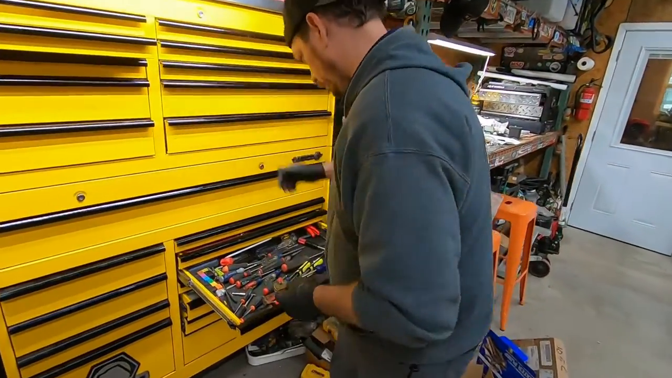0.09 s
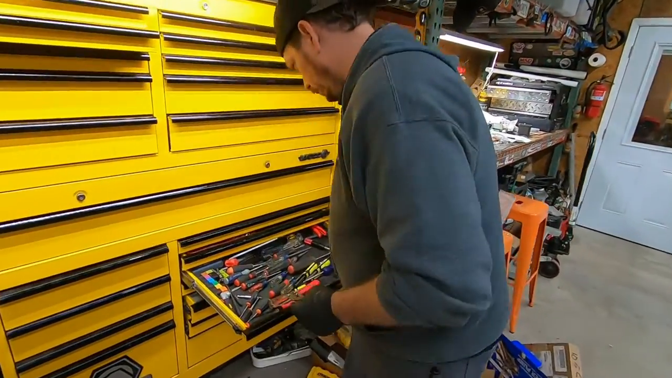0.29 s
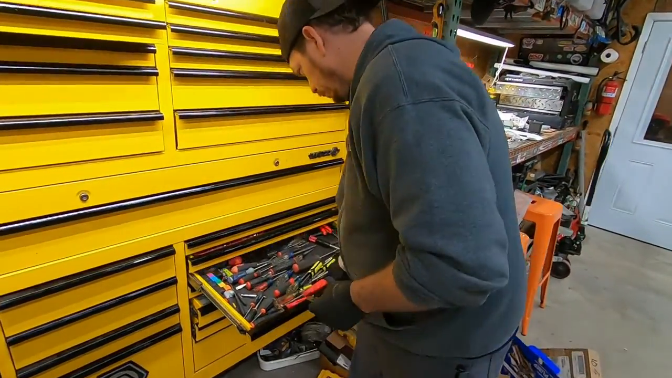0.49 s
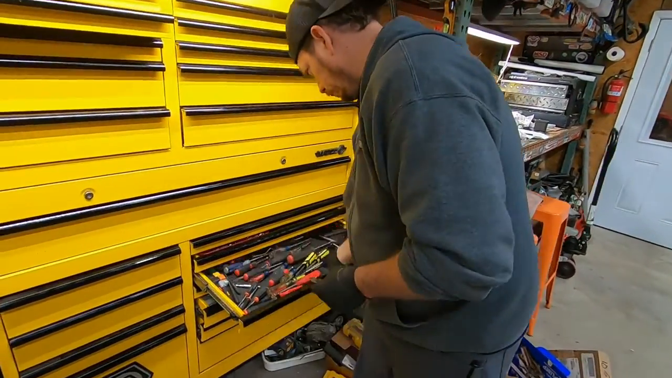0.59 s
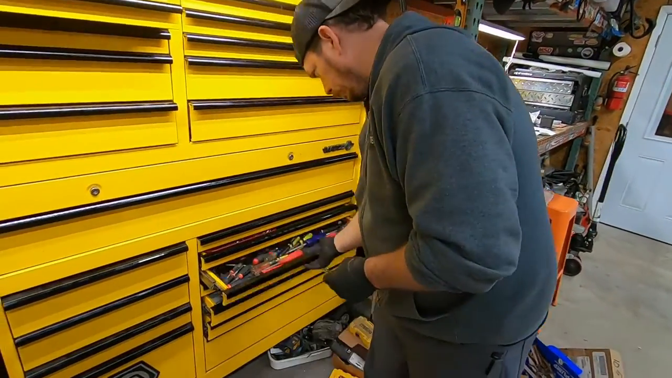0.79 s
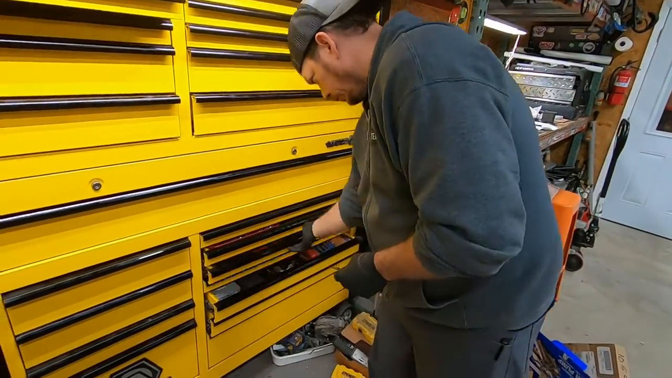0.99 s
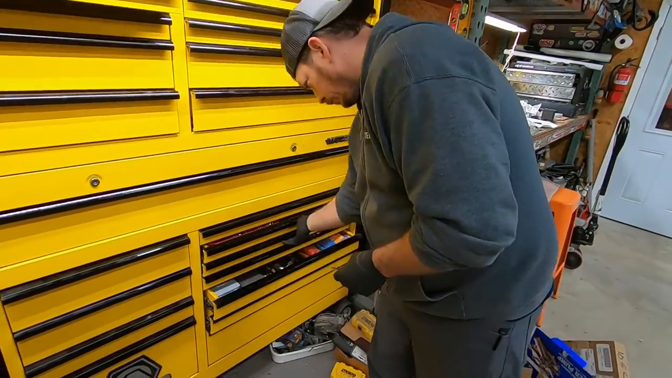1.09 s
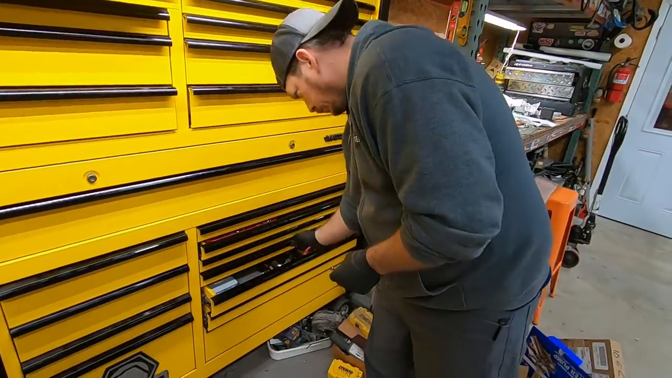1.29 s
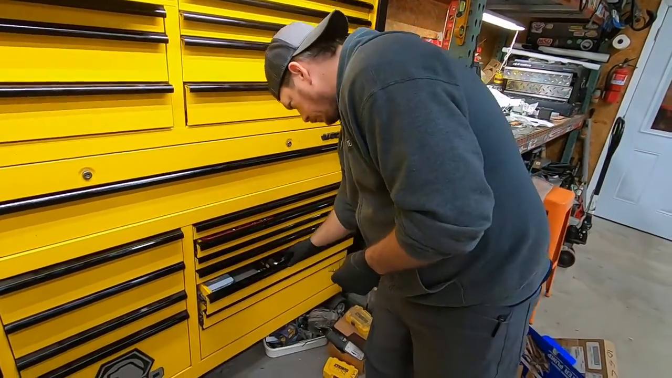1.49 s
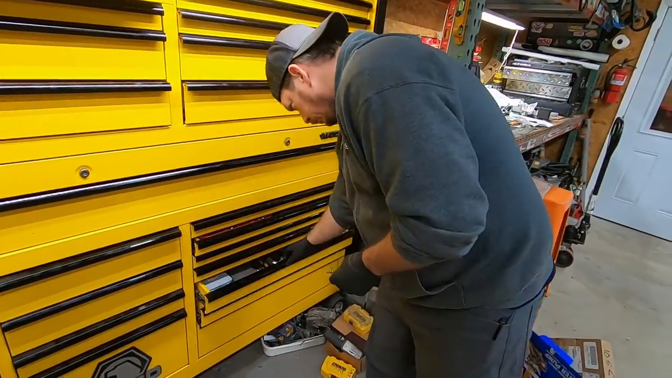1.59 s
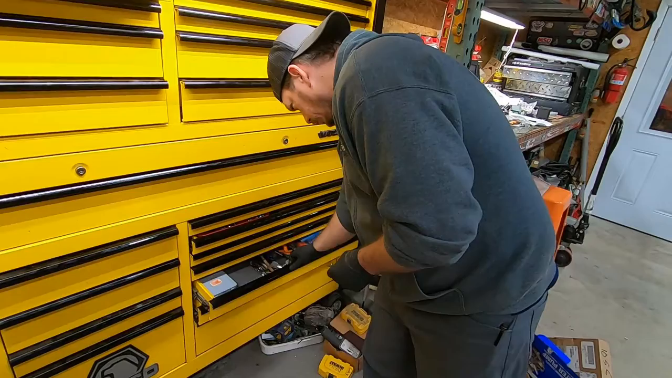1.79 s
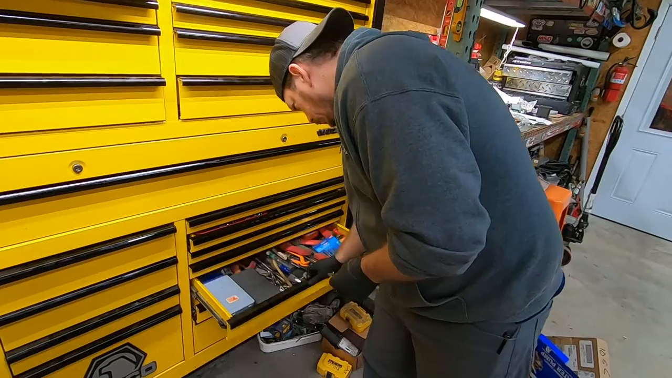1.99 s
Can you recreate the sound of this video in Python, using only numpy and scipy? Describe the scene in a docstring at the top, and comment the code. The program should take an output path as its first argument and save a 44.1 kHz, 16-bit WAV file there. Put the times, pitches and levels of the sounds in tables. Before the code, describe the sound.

Loaded steel tool-chest drawers, close in a quiet workshop, stereo with dulled treble. A faint roll and squeak end in a hollow boom and tool jostle at 0.2 s. From 0.5 s the drawer rattles back, clinking, and slams at 0.9 s, with small clacks around 1.0. A catch ticks at 1.2; a second drawer thuds deeply at 1.27, heavy tools dropping. Runners squeak and roll from 1.7, with a low rocking thump at 1.8.

```python
"""Loaded steel drawers of a big tool chest, heard from close by in a workshop, in stereo with a dull top.
One rolls with a faint squeak to its stop: a boom, and a jostle of tools. It rolls back with a rattle and
a few clinks and slams shut. A catch ticks, a second drawer bumps its stop and drops its heavy tools, and
its runners squeak and roll on while the chest rocks back. Contacts are random clicks that excite ringing
noise; panels, tools and the catch are decaying sines; squeaks are wavering tones."""
import sys
import numpy as np
from scipy import signal
from scipy.fft import rfft, irfft
from scipy.io import wavfile

SR = 44100
rng = np.random.default_rng(int(sys.argv[2]) if len(sys.argv) > 2 else 0)


def transcribe(signal):
    """Save signal, clipped to [-1, 1], as a 16-bit WAV file at the path in sys.argv[1]."""
    frames = np.atleast_2d(signal).T
    limited = np.clip(frames, -1, 1)
    pcm = np.round(limited * 32767).astype(np.int16)
    wavfile.write(sys.argv[1], SR, pcm)


N = 90405
T = np.arange(N) / SR

# Colours, all relative within their source: (frequency [Hz], density [dB per Hz])
AIR_COLOUR = [(25, -5), (60, 3), (180, 6.5), (420, -17), (750, -11.5), (2000, -22), (3200, -21),
              (9000, -29.5), (12000, -80)]  # workshop air
RUMBLE_COLOUR = [(25, -22), (40, -4.5), (90, -6.5), (175, 3), (280, -6.5), (420, -69), (2000, -78)]  # hum of the cabinet
BUMP_COLOUR = [(100, 3), (140, -1.5), (290, -7), (440, -13), (590, -10.5), (850, -20), (1300, -17),
               (2600, -25.5), (4500, -30), (9200, -35.5), (15000, -46)]  # tools jostling at a stop
CLAP_COLOUR = [(200, -2), (330, -8.5), (430, -8.5), (590, -8.5), (1000, -13), (2050, -4.5), (3200, -14),
               (5000, -14), (7000, -9.5), (9200, -16), (15000, -26.5)]  # steel on steel
LATCH_COLOUR = [(400, 1.5), (700, -13.5), (1200, 4), (2100, 1.5), (3200, -3), (5000, -30), (12000, -38)]  # latch clacks
KNOCK_COLOUR = [(150, 7.5), (210, -4), (290, 3), (420, -12), (620, -2), (1100, -11.5), (2000, -11.5),
                (9000, -27)]  # dull tray knocks
ROLL_IN_COLOUR = [(160, 3), (380, -7), (740, -1), (1000, -9), (2300, -11.5), (4000, -24.5), (9500, -26),
                  (15000, -42)]  # drawer rolling shut
ROLL_OUT_COLOUR = [(270, -1), (450, -3), (750, -4), (1900, -11.5), (2800, -9.5), (5000, -18), (9000, -22.5),
                   (12000, -39)]  # drawers rolling out
AIR_DB, RUMBLE_DB = -59, -58  # rms

# Sheet steel and room: (frequency [Hz], decay by 60 dB [s])
RING_T60 = [(100, 1), (400, 0.65), (1500, 0.52), (12000, 0.49)]
# Stereo likeness: (frequency [Hz], left-right correlation [-1 to 1])
LIKENESS = [(100, 0.97), (250, 0.99), (500, 0.89), (1000, 0.43), (2000, 0.61), (4000, 0.78), (8000, 0.0155)]
# Stereo balance: (frequency [Hz], left minus right [dB])
BALANCE_DB = [(1000, 0.1), (4000, 0.5), (8000, -2.3)]

# Rolling of the ball runners: (time [s], level [dB])
ROLL_FIRST = [(0, -48.5), (0.07, -72.5), (0.17, -61)]
ROLL_IN = [(0.471, -55), (0.56, -51.5), (0.61, -45.5), (0.77, -43), (0.83, -43), (0.885, -39),
           (0.90, -71.5)]
ROLL_OUT = [(1.69, -63), (1.728, -58), (1.74, -51.5), (1.81, -53.5), (1.87, -62.5), (1.92, -54),
            (2.05, -59.5)]
GRAINS_PER_S, GRAIN_SPREAD_DB = 2700, 3
# Small parts shaken by the closing drawer; level relative to its rolling
RATTLE_PER_S, RATTLE_SPREAD_DB, RATTLE_DB, RATTLE_T60 = 170, 4, -9, 0.009
# Range of their modes: (lowest [Hz], highest [Hz])
RATTLE_HZ = (1460, 5180)

# Runner squeaks: (start [s], length [s], pitch [Hz], glide [Hz per s], level [dB])
SQUEAKS = [(0.081, 0.085, 3295, -200, -68.5), (1.436, 0.2, 3226, -1100, -69.5),
           (1.841, 0.0303, 770, -2600, -47.5), (2.031, 0.04, 781, -2500, -44)]
SQUEAK_EDGE_S, SQUEAK_OCTAVE_DB = 0.0027, -15  # grip and release time; level of the octave
SQUEAK_WAVER_HZ, WAVER_PER_S = 60, 180

# Clinking loose tools: (time [s], level [dB], pitch [Hz], decay by 60 dB [s])
CLINKS = [(0.6, -38.5, 3280, 0.0069), (0.61, -43, 3580, 0.03), (0.621, -41.5, 2730, 0.09),
          (0.661, -37, 2576, 0.043), (0.6985, -36, 7030, 0.0067), (0.712, -33, 3540, 0.033),
          (0.7445, -34.5, 2210, 0.03), (0.896, -29.5, 1927, 0.12), (0.981, -37, 1728, 0.12),
          (1.022, -35.5, 2056, 0.098), (1.267, -34, 1943, 0.13), (1.283, -35.5, 3180, 0.1)]
SECOND_MODE_RATIO, SECOND_MODE_DB = 1.6, -10.5  # relative to the first mode
# The catch spring: (frequency [Hz], level [dB], decay by 60 dB [s])
CATCH = [(3290, -35, 0.027), (3790, -34.5, 0.024), (4620, -47, 0.06), (4700, -45, 0.12)]
CATCH_S = 1.2056
CATCH_SNAP_DB, CLINK_SNAP_DB = -18, 21  # impulse height; for clinks, above the clink's level
# Loose parts buzz as they ring: phase spread [radians], rate [per s]
BUZZ_RAD, BUZZ_PER_S = 0.55, 220

# Drawer front modes: (frequency [Hz], level relative to the clap [dB])
FRONT = [(1180, -7), (1604, -16), (1960, -9), (2200, -7)]
FRONT_T60 = 0.13
# Heavy tools landing on the tray floor: (time [s], level [dB], pitch [Hz])
THUMPS = [(0.2252, -17.5, 280), (1.2691, -16, 204), (1.309, -12.5, 177), (1.319, -9, 109.5),
          (1.379, -14.5, 97), (2.031, -35, 251)]
THUMP_T60 = 0.054

# Booms, one for each way of striking the cabinet: (time [s], cycles a panel takes to swell)
BOOMS = [(0.226, 1.4), (0.893, 1.9), (1.271, 10.2)]
# Panel modes: (frequency [Hz], decay by 60 dB [s], levels at first stop, slam, second stop [dB])
PANELS = [(40.4, 0.71, -35, -68, -18.5), (71.46, 0.62, -16, -35, -13.5), (113.1, 0.47, -11.5, -29.5, -32),
          (152.5, 0.71, -27, -37, -23.5), (190.4, 0.48, -24, -33.5, -27), (234.4, 0.46, -31.5, -52, -24.5),
          (319.3, 0.28, -35, -23, -26), (581.5, 0.24, -28, -30.5, -37)]
PANEL_FLUTTER_DB, PANEL_FLUTTER_PER_S = 1.8, 14
# The chest rocking on its casters: (frequency [Hz], relative level [dB])
ROCK_MODES = [(37, 0.87), (74, -2.1)]
ROCK_S, ROCK_DB, ROCK_T60 = 1.8, -24.5, 0.17

# Claps in the rails and at the frame: (time [s], level [dB], settling time of the chatter [s])
CLAPS = [(0.175, -66.5, 0.0029), (0.188, -46.5, 0.075), (0.885, -29.5, 0.0039), (0.897, -33.5, 0.0024),
         (0.9785, -37.5, 0.004), (0.992, -43, 0.039), (1.018, -45, 0.0085)]
# Latches gripping or letting go: (time [s], level [dB], settling time of the chatter [s])
LATCHES = [(0.174, -52, 0.006), (0.833, -42, 0.0041), (0.844, -49, 0.004), (0.8967, -37, 0.00082),
           (1.263, -42, 0.03), (1.733, -60, 0.0092)]
# Dull knocks of a tray in its rails: (time [s], level [dB], settling time of the chatter [s])
KNOCKS = [(0.222, -39.5, 0.011), (0.895, -32, 0.012), (1.273, -43.5, 0.002), (2.033, -56, 0.004)]
# Drawers bumping their stops: (time [s], level [dB], swell of the tools [s], their settling time [s])
BUMPS = [(0.214, -25, 0.018, 0.033), (1.27, -27.5, 0.033, 0.031)]

SHELF_HZ, SHELF_DB, CUTOFF_HZ = 10490, -13, 15700  # microphone treble


def from_db(db):
    """Decibels to gain."""
    return 10 ** (np.asarray(db) / 20)


def rms_one(x):
    """Scale to unit rms."""
    return x / np.sqrt(np.mean(x ** 2) + 1e-20)


def at_hz(points, hz):
    """Read a table on a log-frequency axis."""
    p = np.array(points)
    return np.interp(np.log(hz), np.log(p[:, 0]), p[:, 1])


def dying(t, t60):
    """Fall by 60 dB in t60 seconds."""
    return np.exp(-np.log(1000) * t / t60)


def since(s):
    """Seconds elapsed since s, zero before it."""
    return np.maximum(T - s, 0)


def drift(per_s):
    """Smooth chance movement of spread 1."""
    r = np.exp(-2 * np.pi * per_s / SR)
    noise = rng.standard_normal(2 * N)
    return rms_one(signal.lfilter([1], [1, -2 * r, r * r], noise)[N:])


def bands(colour, size):
    """Third-octave stereo noises in a given colour, as (Hz, noise) pairs."""
    edges = 22 * 2 ** (np.arange(30) / 3)
    white = rng.standard_normal((2, 2, size + 8000))  # the first 8000 samples let the filters settle
    sides = np.array([[1], [-1]])
    for k, (low, high) in enumerate(zip(edges, edges[1:])):
        hz = np.sqrt(low * high)
        if high < colour[0][0]:
            continue
        band = signal.butter(2, [low, high], "band", fs=SR, output="sos")
        mid, side = signal.sosfilt(band, white[k % 2])[:, -size:]
        alike = np.clip(at_hz(LIKENESS, hz), -1, 1)
        stereo = np.sqrt(1 + alike) * mid + np.sqrt(1 - alike) * side * sides
        yield hz, from_db(at_hz(colour, hz) + sides * at_hz(BALANCE_DB, hz) / 2) * stereo


def steel(contacts, colour, crack_t60, tail_db):
    """Contacts ring the dense modes of sheet steel: a short crack, then a tail in the room."""
    t, out = T[:SR * 2 // 3], 0
    size = len(t)
    noises = list(bands(colour, 3 * size))
    envelopes = [dying(t, crack_t60) + from_db(tail_db) * dying(t, at_hz(RING_T60, hz))
                 for hz, _ in noises]
    spot = np.arange(N) % 3  # successive samples fall in turn on three spots, each with its own ring
    for k in range(3):
        part = slice(k * size, (k + 1) * size)
        ring = sum(noise[:, part] * envelope for (_, noise), envelope in zip(noises, envelopes))
        ring = ring / np.sqrt(np.sum(ring ** 2) / 2)
        out = out + signal.fftconvolve((contacts * (spot == k))[None], ring, axes=1)[:, :N]
    return out


def grains(per_s, spread_db):
    """Random tiny contacts of uneven size; rms 1."""
    sizes = from_db(spread_db * np.minimum(rng.exponential(1, N), 4)) * rng.choice([-1, 1], N)
    return rms_one(sizes * (rng.random(N) < per_s / SR))


def chatter(s, db, swell, settle, per_s):
    """A flurry of contacts that swells and settles; db is its rms over a tenth of a second."""
    t = since(s)
    flurry = grains(per_s, spread_db=4.0) * (1 - np.exp(-t / swell)) * np.exp(-t / settle)
    # the same energy whatever its length
    return from_db(db) * flurry * np.sqrt(SR / 10 / (np.sum(flurry ** 2) + 1e-20))


def partial(s, hz, db, t60):
    """One mode of a small steel part that buzzes against its neighbour, a little different at each ear."""
    t = since(s)
    phase = 2 * np.pi * hz * t + BUZZ_RAD * drift(BUZZ_PER_S) + rng.normal(0, 0.18, (2, 1))
    gain = from_db(db + rng.normal(0, 3.7, (2, 1)))
    return gain * (1 - np.exp(-t * hz)) * dying(t, t60) * np.sin(phase)


def background():
    """Steady workshop air, and a low rumble of the cabinet once the first blow has stirred it."""
    air = rms_one(sum(noise for _, noise in bands(AIR_COLOUR, N)))
    rumble = rms_one(sum(noise for _, noise in bands(RUMBLE_COLOUR, N)))
    stirred = np.clip((T - BUMPS[0][0]) / 0.035, 0, 1)
    return from_db(AIR_DB) * air + from_db(RUMBLE_DB) * rumble * stirred


def rolling_gain(curve):
    """Gain along a rolling curve, silent outside it."""
    s, db = np.transpose(curve)
    return from_db(np.interp(T, s, db)) * (T >= s[0]) * (T <= s[-1])


def runners():
    """Balls roll in the rails and shake the tray: dense tiny contacts ring its steel."""
    def roll(curve):
        return grains(GRAINS_PER_S, GRAIN_SPREAD_DB) * rolling_gain(curve)
    closing = steel(roll(ROLL_IN), ROLL_IN_COLOUR, crack_t60=0.056, tail_db=-20.0)
    opening = steel(roll(ROLL_FIRST) + roll(ROLL_OUT), ROLL_OUT_COLOUR, crack_t60=0.014, tail_db=-5.0)
    return closing + opening


def rattle():
    """The closing drawer shakes its small parts; each tick rings their short modes with new strengths."""
    ticks, out = grains(RATTLE_PER_S, RATTLE_SPREAD_DB), np.zeros((2, N))
    t = T[:SR // 20]
    for hz in np.geomspace(*RATTLE_HZ, num=20):
        ring = dying(t, RATTLE_T60) * np.sin(2 * np.pi * hz * t + rng.normal(0, 0.39, (2, 1)))
        strikes = ticks * rng.standard_normal(N)
        out += signal.fftconvolve(strikes[None], ring, axes=1)[:, :N]
    return rms_one(out) * from_db(RATTLE_DB) * rolling_gain(ROLL_IN)


def squeaks():
    """Friction feeds one resonance of a runner in fits and starts; the pitch sinks as the drawer slows."""
    out = np.zeros(N)
    for s, length, hz, glide, db in SQUEAKS:
        pitch = hz + glide * (T - s) + SQUEAK_WAVER_HZ * drift(WAVER_PER_S)
        phase = 2 * np.pi * np.cumsum(pitch) / SR
        edges = np.clip(np.minimum(T - s, s + length - T) / SQUEAK_EDGE_S, 0, 1)
        grip = edges * np.abs(1 + drift(WAVER_PER_S / 2))
        out += from_db(db) * (np.sin(phase) + from_db(SQUEAK_OCTAVE_DB) * np.sin(2 * phase)) * grip
    return out


def clinks():
    """Tools touch with a snap and two short partials; the catch spring ticks."""
    rings = sum(partial(CATCH_S, hz, db, t60) for hz, db, t60 in CATCH)
    snaps = np.zeros(N)
    snaps[int(CATCH_S * SR)] = from_db(CATCH_SNAP_DB)
    for s, db, hz, t60 in CLINKS:
        snaps[int(s * SR)] = from_db(db + CLINK_SNAP_DB)
        rings = rings + partial(s, hz, db, t60)
        rings = rings + partial(s, hz * SECOND_MODE_RATIO, db + SECOND_MODE_DB, t60)
    snap_colour = [(500, 24.5), (4000, 16.5), (9500, 7), (13000, 1.5)]  # (frequency [Hz], density [dB per Hz])
    return rings + steel(snaps, snap_colour, crack_t60=0.022, tail_db=-3.5)


def front():
    """The drawer front rings on after each clap, buzzing against the frame."""
    out, t = np.zeros((2, N)), T[:SR // 2]
    for hz, mode_db in FRONT:
        buzz = BUZZ_RAD * drift(BUZZ_PER_S)
        for s, db, length in CLAPS:
            span = slice(int(s * SR), int(s * SR) + len(t))
            phase = 2 * np.pi * (hz * t + rng.random()) + buzz[span] + rng.normal(0, 0.42, (2, 1))
            envelope = (1 - np.exp(-t / length)) * dying(t, FRONT_T60)
            out[:, span] += from_db(db + mode_db) * envelope * np.sin(phase)
    return out


def thumps():
    """Heavy tools drop back and the tray floor gives a short low note."""
    out = np.zeros(N)
    for s, db, hz in THUMPS:
        t = since(s)
        envelope = (1 - np.exp(-2 * t * hz)) * dying(t, THUMP_T60)
        out += from_db(db) * envelope * np.sin(2 * np.pi * hz * t)
    return out


def booms():
    """Big panels ring low after each blow, unevenly under the shifting load, the deepest swelling slowest."""
    out = np.zeros(N)
    for k, (s, cycles) in enumerate(BOOMS):
        t = since(s)
        for hz, t60, *db in PANELS:
            gain = from_db(db[k] + PANEL_FLUTTER_DB * drift(PANEL_FLUTTER_PER_S))
            envelope = (1 - np.exp(-t * hz / cycles)) * dying(t, t60)
            out += gain * envelope * np.sin(2 * np.pi * (hz * t + rng.random()))
    return out


def rocking():
    """The chest rocks back on its casters: two short, very low tones."""
    t, out = since(ROCK_S), np.zeros(N)
    for hz, db in ROCK_MODES:
        envelope = (1 - np.exp(-t * hz)) * dying(t, ROCK_T60)
        out += from_db(ROCK_DB + db) * envelope * np.sin(2 * np.pi * hz * t)
    return out


def impacts():
    """Bright claps of steel on steel, with clacks of the latches and duller knocks of the trays."""
    claps = sum(chatter(s, db, 0.001, length, per_s=4500) for s, db, length in CLAPS)
    latches = sum(chatter(s, db, 0.00091, length, per_s=2100) for s, db, length in LATCHES)
    knocks = sum(chatter(s, db, 0.00053, length, per_s=3600) for s, db, length in KNOCKS)
    return (steel(claps, CLAP_COLOUR, crack_t60=0.031, tail_db=-16.0)
            + steel(latches, LATCH_COLOUR, crack_t60=0.11, tail_db=-14.0)
            + steel(knocks, KNOCK_COLOUR, crack_t60=0.11, tail_db=-7))


def bumps():
    """The drawer stops short and its tools jostle on their liner."""
    contacts = sum(chatter(s, db, swell, settle, per_s=1500) for s, db, swell, settle in BUMPS)
    return steel(contacts, BUMP_COLOUR, crack_t60=0.13, tail_db=-6.5)


def scene():
    """All sounds of the chest in the workshop, from the background to the blows."""
    rolling = runners() + rattle() + squeaks()
    ringing = clinks() + front() + thumps() + booms() + rocking()
    return background() + rolling + ringing + impacts() + bumps()


def record(dry):
    """The microphone shelves its highest octave, then the top is cut steeply."""
    hz = np.arange(N + 1) * SR / (2 * N)
    shelf = from_db(SHELF_DB / 2 * (1 + np.tanh(20 * (hz / SHELF_HZ - 1))))
    shelved = irfft(rfft(dry, 2 * N) * shelf)[:, :N]
    return signal.sosfilt(signal.ellip(10, 0.2, 80, CUTOFF_HZ, fs=SR, output="sos"), shelved)


dry = scene()
out = record(dry)
transcribe(out)
```